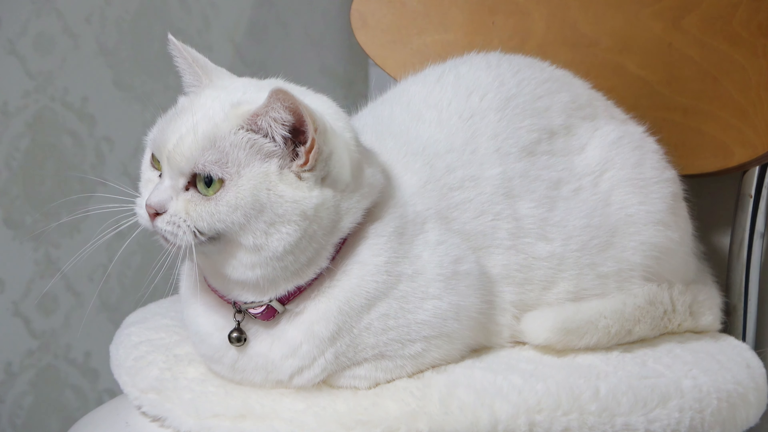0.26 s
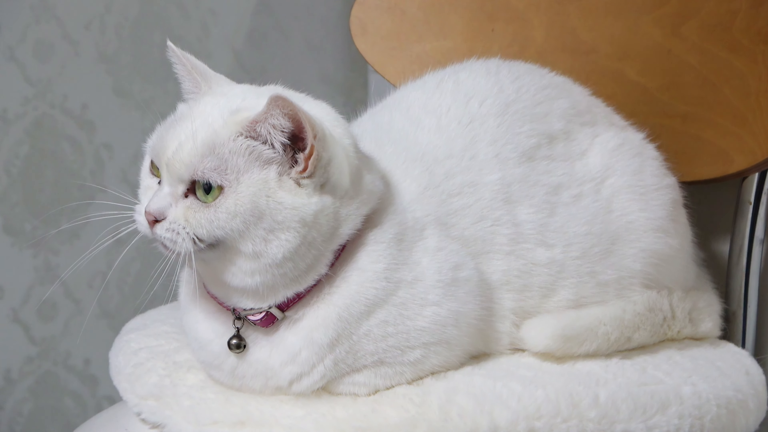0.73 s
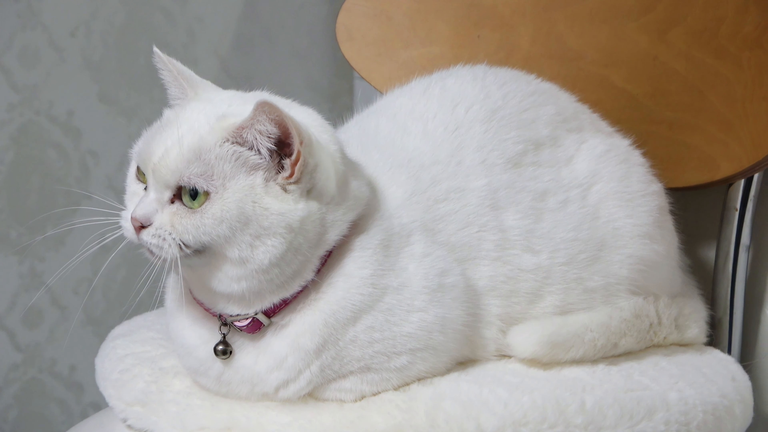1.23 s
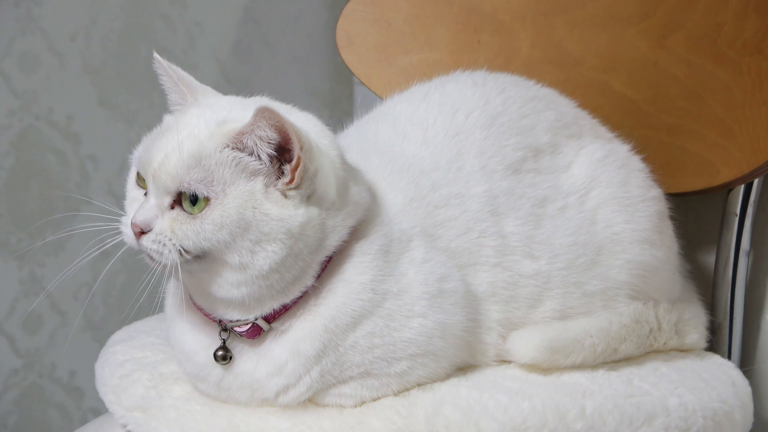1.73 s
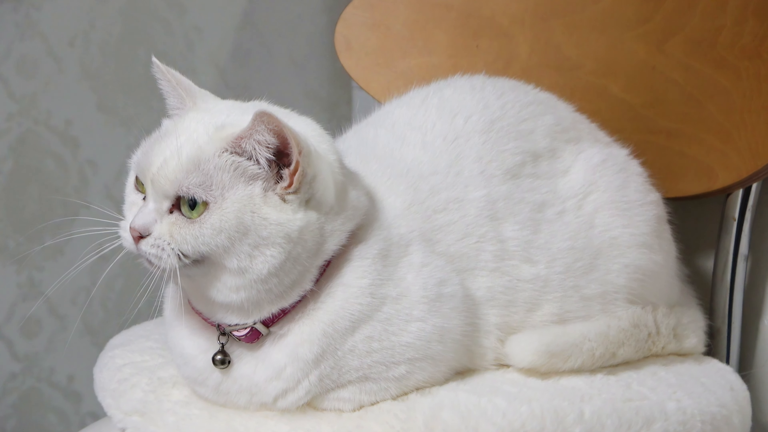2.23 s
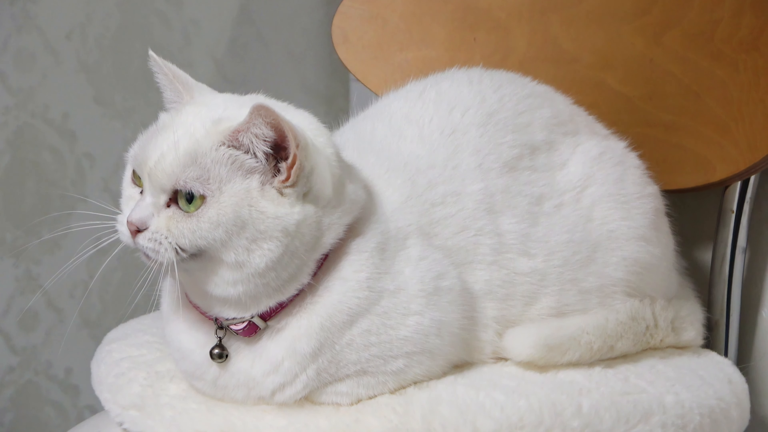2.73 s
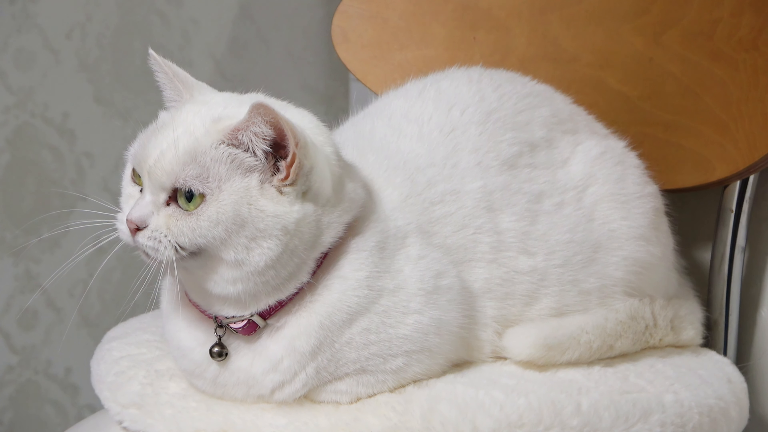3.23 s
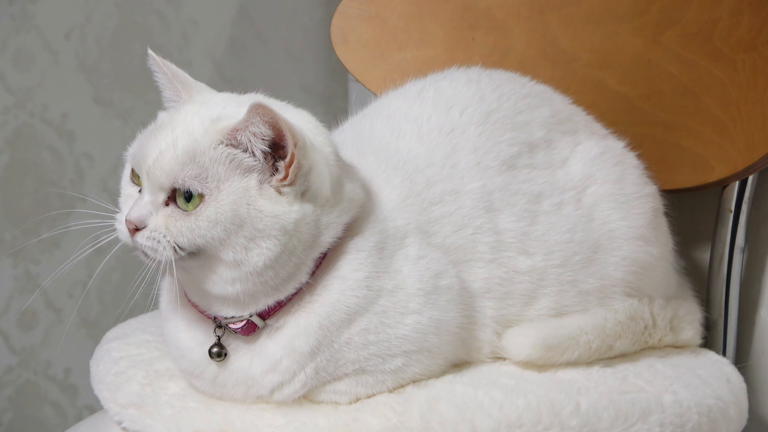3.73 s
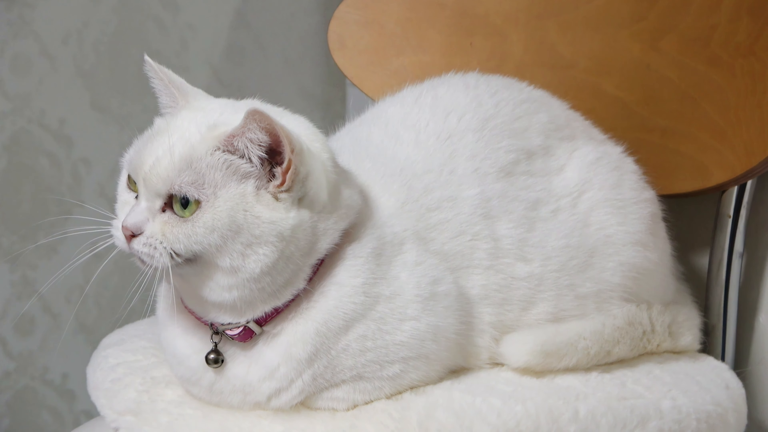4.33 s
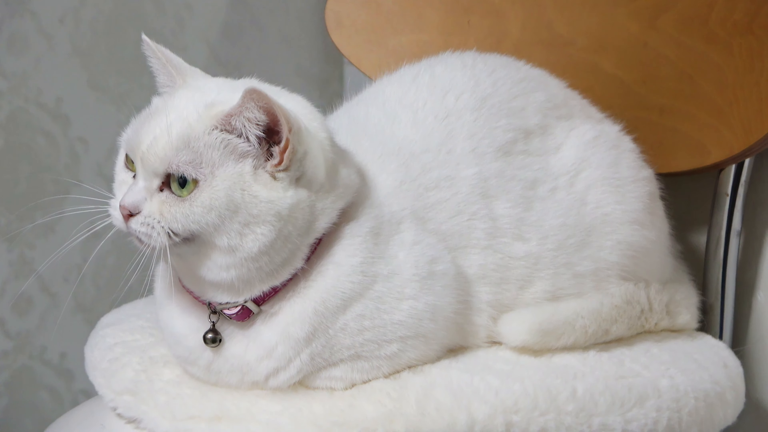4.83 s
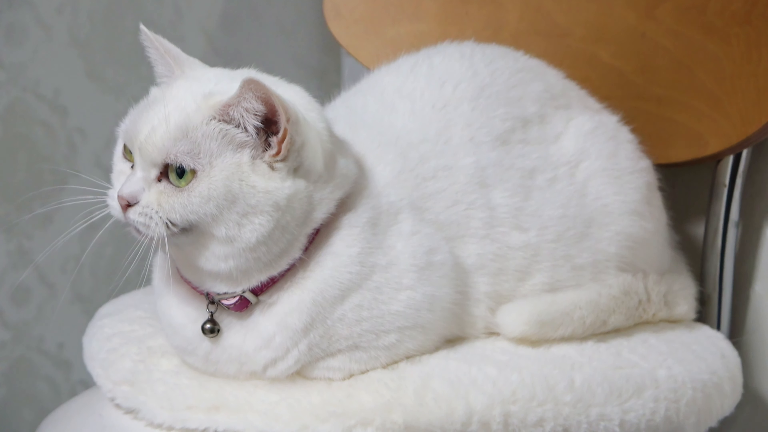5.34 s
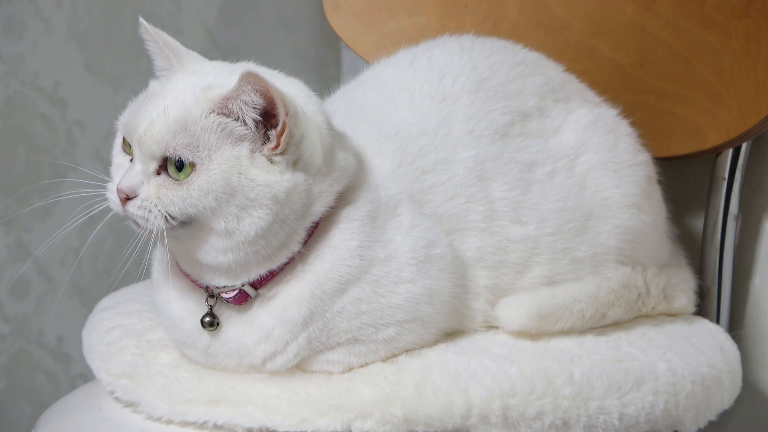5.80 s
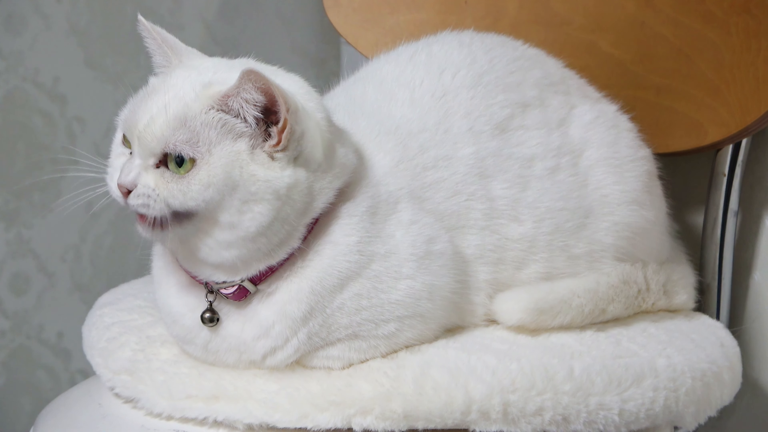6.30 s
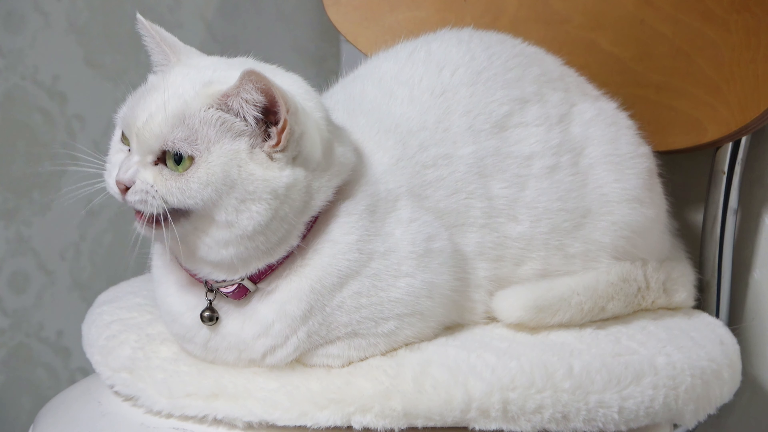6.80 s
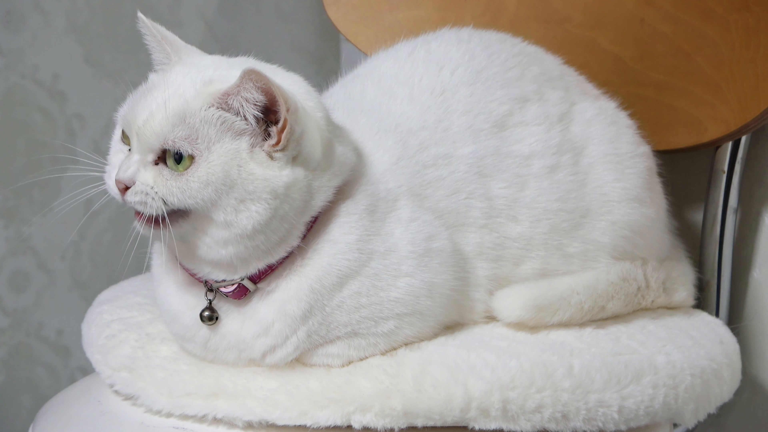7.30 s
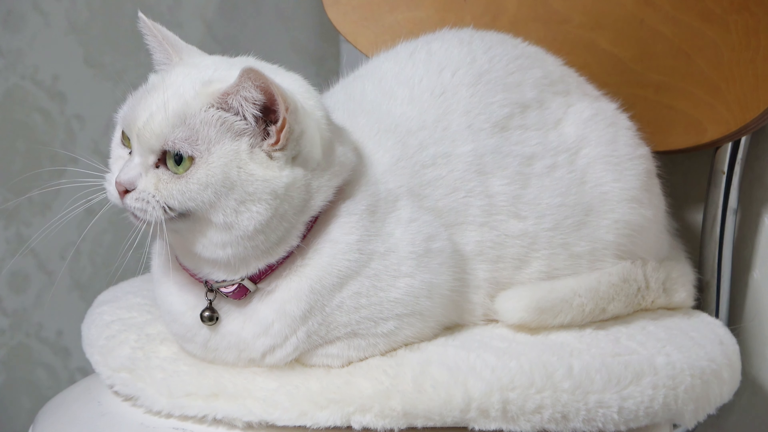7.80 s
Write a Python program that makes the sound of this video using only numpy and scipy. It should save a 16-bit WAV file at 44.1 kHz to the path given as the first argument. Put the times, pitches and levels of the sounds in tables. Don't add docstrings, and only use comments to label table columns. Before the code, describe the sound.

A camera in an unsteady hand rumbles, bumps and faintly creaks, with dull plastic knocks and short finger scrapes through the first five seconds. Behind it is a small indoor room with soft fan-like hum and hiss. Past six seconds the cat gives an irregular chatter: soft smacks, two very short breathy squeaks, then sparse crisp teeth clicks, the hardest early on, echoing off chair and wall. It ends quietly.

```python
import sys
import numpy as np
from scipy import signal
from scipy.io import wavfile
from scipy.ndimage import uniform_filter1d

SR = 44100
rng = np.random.default_rng(int(sys.argv[2]) if len(sys.argv) > 2 else 0)


def boost_factor(decibels):
    exponent = np.asarray(decibels, float) / 20
    return 10 ** exponent


def log_audio(samples):
    frames = np.atleast_2d(samples).T
    limited = np.clip(frames, -1, 1)
    pcm = np.round(limited * 32767).astype(np.int16)
    wavfile.write(sys.argv[1], SR, pcm)


N = 355093

# frequency in Hz, level in dB per Hz.
HISS_SPECTRUM = [(20, -1), (101, -9), (290, -9), (453, -15), (565, -22), (812, -18), (2150, -26),
                 (15600, -32.5)]
# frequency in Hz, width in Hz, level in dB.
FAN_PEAKS = [(411, 14, -66), (724, 187, -54.5), (947, 46, -63), (1236, 210, -61.5), (1780, 75, -71.5),
             (2800, 350, -64.5)]
HISS_DB = -50
WHINE_HZ, WHINE_DB = 15690, -79

# time in seconds, level in dB.
GRIP = [(0, -32), (.2, -41), (.27, -46), (.75, -38.5), (.95, -42), (1.4, -38.5), (1.9, -35.5), (2.0, -42.5),
        (3.1, -38.5), (3.4, -40.5), (5.55, -42.5), (5.9, -35.5), (6.2, -45), (6.35, -39.5), (6.95, -38.5),
        (7.3, -50), (7.45, -50), (8.05, -51)]
# centre in seconds, half length in seconds, swing in dB, judder in dB.
LURCHES = [(0.555, 0.1, -23.5, -42), (0.853, 0.098, -41, -38), (1.117, 0.12, -28, -34.5),
           (1.29, .05, -29, -43), (1.534, 0.026, -28, -55), (1.627, 0.046, -26.5, -41),
           (1.73, 0.079, -33, -34), (1.773, 0.085, -29.5, -47), (2.085, 0.063, -28, -39),
           (2.484, 0.057, -22, -21.5), (2.634, 0.036, -20, -35), (2.822, 0.037, -35, -40),
           (2.933, 0.12, -22, -47), (3.69, 0.096, -30, -43), (3.872, 0.073, -13.5, -27.5),
           (4.008, 0.084, -17.5, -35), (4.113, 0.08, -21, -30.5), (4.223, 0.067, -28, -33.5),
           (4.35, 0.061, -22, -33), (4.515, 0.047, -15.5, -35), (4.82, 0.36, -29, -37),
           (5.03, 0.076, -18.5, -36), (5.216, 0.033, -31, -50.5), (5.375, 0.084, -29, -40),
           (5.662, .07, -33.5, -48), (6.525, 0.067, -22, -52), (6.673, 0.043, -26.5, -40),
           (6.801, 0.032, -25.5, -40), (7.716, 0.039, -31.5, -54), (7.82, 0.1, -55, -44.5)]
# start in seconds, shell peak in dB, sway in dB, tremor in dB.
THUDS = [(0.301, -30.5, -30, -26), (0.508, -36, -22, -19.5), (0.811, -37, -35, -46), (1, -22, -26, -27),
         (1.583, -27.5, -31, -41), (2.345, -32, -16, -15), (2.436, -28, -18, -24), (2.514, -19.5, -27, -20),
         (2.563, -23, -20.5, -19), (2.874, -26, -29, -29.5), (3.626, -31, -39, -27.5),
         (3.782, -22, -24, -26.5), (3.849, -33.5, -16, -22), (4.046, -25, -28, -25),
         (4.443, -35, -20, -22.5), (4.654, -28.5, -46, -28), (4.755, -25, -33, -47),
         (4.819, -28.5, -33, -49), (6.461, -38, -21.5, -38)]
# rest level in dB, share of the grip (0-1),
# level after a thud in dB, dying in dB per second, judder in dB.
ANSWER = [(-39, 1, -2.5, 139, -20), (-51.5, 0.35, -8, 163, -1), (-54.5, .2, -12, 252, -10.5)]
# frequency in Hz, width in Hz, level in dB.
SWAY_MODES = [(17.8, 6.9, 1.5), (24.9, 8.3, 2.5), (33, 5.55, -1), (46.1, 17.6, -12.5)]
# frequency in Hz, width in Hz, level in dB.
TREMOR_MODES = [(67.1, 10.2, 7), (93.2, 18, -6), (116.1, 8.1, 2.5), (137, 26, -15)]
# frequency in Hz, width in Hz, level in dB.
SHELL_MODES = [(183.3, 26, -5.5), (223, 18, 0), (256, 85, -7), (286.6, 13, 4.5)]
# start in seconds, length in seconds, level in dB, centre in
# Hz, width in Hz.
RUBS = [
    (0.54, 0.05, -47, 5500, 1500),
    (1.354, 0.05, -53.5, 8400, 2700),
    (2.431, 0.068, -52, 4300, 4700),
    (2.5115, 0.0043, -40, 3300, 900),
    (2.512, 0.0047, -40, 6100, 1400),
    (2.517, 0.044, -50, 3220, 500),
    (2.518, 0.045, -48, 4860, 2500),
    (4.8, 0.025, -60, 5600, 4000),
    (4.942, 0.064, -58.5, 5450, 1400),
    (5.262, 0.19, -62, 6010, 4320),
]
# time in seconds, peak in dB, brightness in dB per octave.
KNOCKS = [
    (2.345, -37, 9),
    (2.47, -35, -6),
    (2.512, -28, -3),
    (2.562, -33.5, 5.5),
    (3.785, -22.5, -6),
    (3.809, -29.5, 1),
    (4.751, -16.5, -8),
    (4.867, -27, -14),
]
# frequency in Hz, level in dB, decay by 60 dB in seconds.
CASING = [(678, -2, .08), (742, 0, .1), (940, -3, .055), (1060, -3, .055), (1310, -8, .06),
          (1570, -11, .045), (2100, -16, .03), (3300, -25, .012)]
CREAK_DB = -25.5
TICK_DB, TICK_HZ, TICK_WIDTH, TICK_S = -15, 2100, 900, .0028

# delay in seconds, level in dB.
ECHOES = [(.0017, -16), (.0063, -13), (.0079, -10), (.0092, -14), (.0148, -12), (.0166, -15), (.0235, -17),
          (.029, -18)]
# frequency in Hz, width in Hz, level in dB.
WALL = [(2900, 800, 0), (4900, 1400, -7), (2000, 1500, -12)]
TAIL_DB, TAIL_T60 = -12, .25

# start in seconds, length in seconds, level in dB, centre in Hz,
# width in Hz.
PUFFS = [
    (6.37, 0.035, -54, 4800, 2500),
    (7.262, .04, -56, 5000, 2500),
]
# start in seconds, length in seconds, effort in dB, settled pitch in Hz, place of peak (0-1).
SQUEAKS = [
    (6.347, 0.073, -40, 575, 0.23),
    (6.5626, 0.053, -38, 608, 0.76),
]
# time after start in seconds, mouth resonance in Hz.
MOUTHS = [
    [(0, 2200), (.007, 1920), (.022, 2940), (.032, 2220), (.058, 2900)],
    [(0, 2200), (.007, 2440), (.032, 1500), (.039, 2930), (.05, 2600)],
]
# frequency in Hz, width in Hz, level in dB.
THROAT = [(570, 200, -14), (1180, 350, 0), (1800, 500, -6), (2900, 1100, -8), (3750, 400, -11)]
MOUTH_WIDTH, MOUTH_DB = 530, 2
ONSET_DB, RELEASE_DB = -6.5, -23
PITCH_DROP, DROP_S = 0.141, 0.00777
ROUGH_START, ROUGH_HELD, ROUGH_END, CLEAR_S = .4, .16, .85, .004
# time in seconds, peak in dB, mouth ring in Hz, sharp edge in dB, facing the wall in dB.
CLICKS = [
    (6.3034, -35, 2720, -8, 2),
    (6.5945, -31, 2650, -14, 3),
    (6.6008, -33.5, 2660, -6, 5),
    (6.8089, -22, 2960, -5, -0.5),
    (6.8684, -27, 2800, -16, -1),
    (7.1094, -31.5, 2940, -16, -4),
    (7.1808, -28, 3040, -14, -3),
    (7.2507, -28.5, 2860, -7, 1),
]
# time in seconds, peak in dB, mouth ring in Hz, width in Hz, facing the wall in dB.
SMACKS = [
    (6.263, -41, 4000, 600, -2),
    (6.3455, -34, 2250, 450, 1),
    (6.3753, -35, 2300, 1300, -8),
    (6.5216, -31, 2800, 1000, 0),
    (6.5655, -35, 2180, 496, -3),
]
CLICK_WIDTH, SMACK_EDGE_DB = 2050, -16
EDGE_HZ = 4900


def evened(x):
    return x / np.sqrt(np.mean(x ** 2) + 1e-20)


def add(mix, s, sound):
    part = mix[round(s * SR):][:len(sound)]
    part += sound[:len(part)]


def resonate(x, hz, width):
    turn = np.exp(2j * np.pi * np.cumsum(hz * np.ones(len(x))) / SR)
    r = np.exp(-np.pi * width / SR)
    return 2 * (turn * signal.lfilter([1 - r], [1, -r], x / turn)).real


def steep(x, hz, width):
    return resonate(resonate(x, hz, width), hz, width)


def body(x, modes):
    return sum((-1) ** k * boost_factor(db) * steep(x, hz, 1.19 * width) for k, (hz, width, db) in enumerate(modes))


def lumps(per_s):
    return evened(signal.resample(rng.standard_normal(round(per_s * N / SR)), N))


def hum():
    hz = np.fft.rfftfreq(1024, 1 / SR)
    a, b, patches = rng.standard_normal((N // 256 + 5, 513, 3)).T
    patches = evened(uniform_filter1d(uniform_filter1d(patches, 20, 0), 10, 1))
    f, db = np.transpose(HISS_SPECTRUM)
    colour_db = np.interp(np.log(hz + 1), np.log(f), db)[:, None]
    z = (a + 1j * b) * boost_factor(colour_db + 0.71 * patches)
    hiss = signal.istft(z, nperseg=1024, noverlap=768)[1][:N]
    hiss /= np.std(np.diff(hiss)) * 0.93
    air = rng.standard_normal(N) * boost_factor(1.4 * lumps(12))
    fan = sum(boost_factor(db) * evened(body(air, [(f, width, 0)])) for f, width, db in FAN_PEAKS)
    whine = boost_factor(WHINE_DB) * np.sqrt(2) * np.sin(2 * np.pi * WHINE_HZ * np.arange(N) / SR)
    return boost_factor(HISS_DB - 3) * hiss + fan + whine


def thud_db(row, k):
    return row[1 + (k + 1) % 3]


def shaking(k):
    t = np.arange(0, N + 50, 50) / SR
    rest_db, share, after_db, dying_db, judder_db = ANSWER[k]
    grip_db = np.interp(t, *np.transpose(GRIP)) + 42.5
    power = boost_factor(2 * (rest_db + share * grip_db))
    for s, half, swing_db, rough_db in LURCHES:
        lurch_db = rough_db + judder_db if k else swing_db
        power = power + boost_factor(2 * lurch_db) * np.exp(-2 * ((t - s) / half) ** 2)
    for row in THUDS:
        shudder_db = thud_db(row, k) + after_db - dying_db * abs(t - row[0])
        power = power + boost_factor(2 * shudder_db) * (t > row[0])
    return np.interp(np.arange(N) / SR, t, np.sqrt(power))


def handling():
    t, out = np.arange(N) / SR, np.zeros(N)
    shared = lumps(24)
    calm_db = sum(-7.0 * np.clip(1 - (row[0] - t) / 0.022, 0, 1) * (t < row[0]) for row in THUDS)
    blow = signal.windows.hann(round(0.0031 * SR))
    # modes, lumpiness in dB, thud trim in dB, softening of the calm in samples
    groups = [(SWAY_MODES, 1.5, -3, SR // 40), (TREMOR_MODES, 3.0, -3, SR // 100),
              (SHELL_MODES, 3.0, -1.5, SR // 250)]
    for k, (modes, lumpy_db, trim_db, soft) in enumerate(groups):
        shake = body(rng.standard_normal(N) * boost_factor(lumpy_db * shared), modes)
        held = uniform_filter1d(uniform_filter1d(shake ** 2, SR // 14), SR // 14)
        shake = shake / np.sqrt(abs(held) + 1e-12)
        out += shake * shaking(k) * boost_factor(uniform_filter1d(calm_db, soft))
        ring = body(np.pad(blow, (0, SR // 2)), modes)
        for row in THUDS:
            add(out, row[0], ring / abs(ring).max() * boost_factor(thud_db(row, k) + trim_db))
    return out


def friction(rows):
    out = np.zeros(N)
    for s, length, db, hz, width in rows:
        noise = rng.standard_normal((2, SR // 4))
        u = np.arange(SR // 4) / SR / length
        grains = noise[0] * boost_factor(2.5 * evened(uniform_filter1d(noise[1], 60)))
        swell = np.minimum(12 * u, 1) * np.exp(-2.5 * u ** 2)
        add(out, s, boost_factor(db) * evened(body(grains, [(hz, width, 0)])) * swell)
    return out


def knocks():
    t = np.arange(round(.12 * SR)) / SR
    short = t[:1500]
    creak = body(rng.standard_normal(N), [(hz, 8.4 / t60, db) for hz, db, t60 in CASING])
    out = evened(creak) * shaking(2) * boost_factor(CREAK_DB)
    for s, db, bright_db in KNOCKS:
        chance = rng.standard_normal(1500)
        ring = np.zeros(len(t))
        for k, (hz, mode_db, t60) in enumerate(CASING):
            level = boost_factor(mode_db + bright_db * np.log2(hz / 700) - 60 * t / t60)
            build = np.minimum(t / 0.0039 * (hz / 700) ** 3, 1)
            ring += (-1) ** k * level * np.sin(2 * np.pi * hz * t) * build
        rattle = 0.035 * chance * np.exp(-short / 0.011) + (short == 0)
        ring = signal.fftconvolve(ring, rattle)
        add(out, s - .0012, boost_factor(db - 3.5) * ring / abs(ring).max())
        tick = evened(resonate(chance, TICK_HZ, TICK_WIDTH)) * np.exp(-short / TICK_S)
        add(out, s, boost_factor(db + TICK_DB + bright_db) * tick)
    return out


def room(x):
    t = np.arange(round(.4 * SR)) / SR
    tail = rng.standard_normal(len(t)) * boost_factor(-60 * t / TAIL_T60) * (t > .004)
    taps = boost_factor(TAIL_DB) * tail / np.linalg.norm(tail)
    for s, db in ECHOES:
        add(taps, s, boost_factor(db) * 0.32 * evened(rng.standard_normal(size=8)))
    return signal.oaconvolve(x, boost_factor(6.5) * body(taps, WALL))[:N]


def squeak(length, peak_db, settled_hz, place, mouth):
    t = np.arange(0, length, 1 / SR)
    u = t / length
    effort_db = peak_db + np.interp(u, [0, place, 1], [ONSET_DB, 0, RELEASE_DB])
    hz = settled_hz * (1 + PITCH_DROP * np.exp(-t / DROP_S))
    rough = np.interp(u, [place, 1], [ROUGH_HELD, ROUGH_END]) + ROUGH_START * np.exp(-t / CLEAR_S)
    rough = np.clip(rough, 0, 1)
    mouth_hz = np.interp(t, *np.transpose(mouth))
    chance = rng.standard_normal((2, len(t)))
    turns = np.cumsum(hz * (1 + 0.23 * uniform_filter1d(chance[0], 70))) / SR
    folds = sum(np.cos(2 * np.pi * k * turns + .5 * k ** 2) for k in range(1, 8))
    breath = (.3 + np.exp(-(turns % 1) / .3)) * chance[1]
    drive = (1 - rough) * evened(folds) + rough * evened(breath)
    voice = body(drive, THROAT) + boost_factor(MOUTH_DB) * steep(drive, mouth_hz, MOUTH_WIDTH)
    voice /= np.sqrt(uniform_filter1d(voice ** 2, 300) + 1e-9)
    return boost_factor(effort_db) * voice * signal.windows.tukey(len(t), .05)


def mouth_click(hz, width, edge_db):
    t = np.arange(300) / SR - .0013
    ring = np.cos(2 * np.pi * hz * t) + boost_factor(edge_db) * np.cos(2 * np.pi * EDGE_HZ * t)
    rise = np.exp(-(3.0 * width * np.minimum(t, 0)) ** 2)
    click = ring * rise / np.cosh(2.9 * width * np.maximum(t, 0))
    return -click / click.max()


def cat():
    out = friction(PUFFS)
    for (s, *voice), mouth in zip(SQUEAKS, MOUTHS):
        add(out, s, squeak(*voice, mouth))
    away = out * boost_factor(-11)
    snaps = [(s, db, facing_db, mouth_click(hz, CLICK_WIDTH, edge_db))
             for s, db, hz, edge_db, facing_db in CLICKS]
    snaps += [(s, db, facing_db, mouth_click(hz, width, SMACK_EDGE_DB))
              for s, db, hz, width, facing_db in SMACKS]
    for s, db, facing_db, click in snaps:
        add(out, s, boost_factor(db) * click)
        add(away, s, boost_factor(db + facing_db) * click)
    return out, away


def scene():
    direct, away = cat()
    background = hum()
    camera = handling() + knocks() + friction(RUBS)
    return (background + camera + direct + room(away))[None]


def roll_off(x):
    return signal.sosfilt(signal.butter(12, 15700, fs=SR, output="sos"), x)


def record(dry):
    return roll_off(dry)


dry = scene()
out = record(dry)
log_audio(out)
```